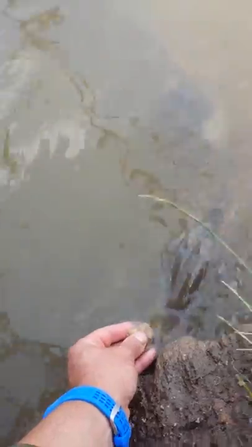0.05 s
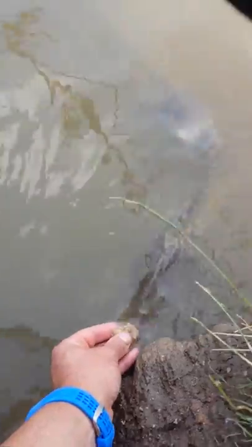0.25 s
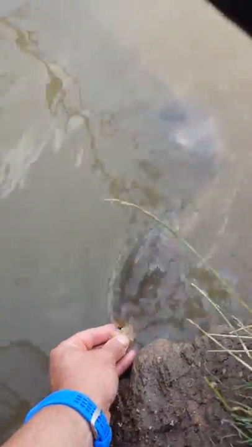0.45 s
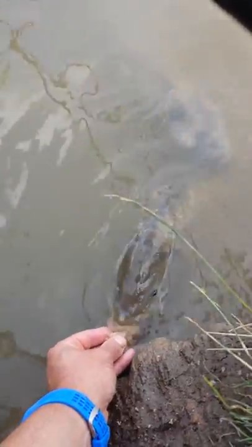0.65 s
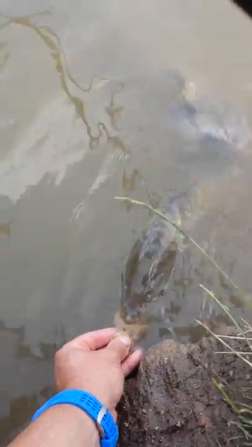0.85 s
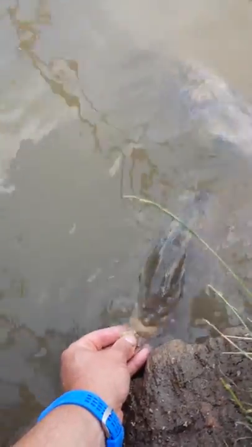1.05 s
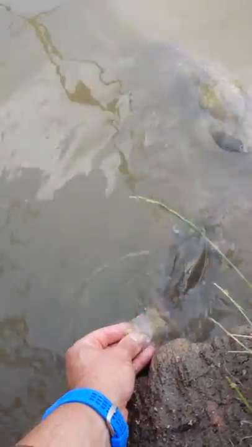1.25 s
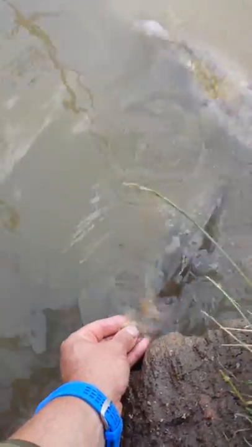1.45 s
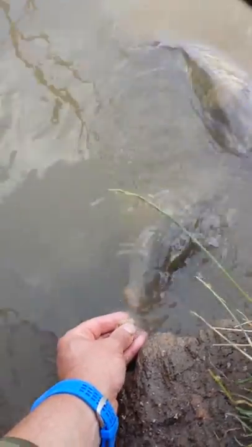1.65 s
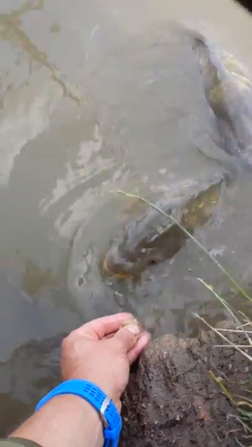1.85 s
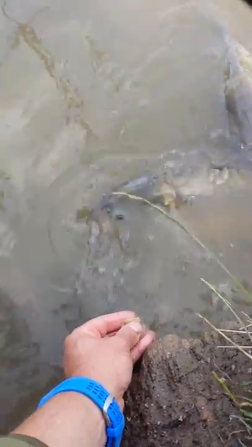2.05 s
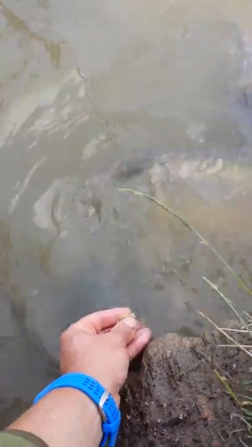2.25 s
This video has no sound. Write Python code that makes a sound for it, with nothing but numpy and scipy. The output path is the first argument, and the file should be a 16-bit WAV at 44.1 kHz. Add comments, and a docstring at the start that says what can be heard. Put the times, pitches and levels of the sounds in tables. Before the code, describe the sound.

A fish slurps and gulps at the water surface while wind buffets the microphone.

```python
"""At the bank of a pond, close to a phone, a carp sucks at food held at the surface.
Air and water crackle through its lips in a slurp, and bursting films excite the resonances of the
mouth as it smacks shut. As the fish turns away, pockets of air ring in gulps that rise in pitch.
Turbulent wind buffets the two microphone ports separately, over a steady hiss of grass and leaves."""
import sys
import numpy as np
from scipy import signal
from scipy.fft import rfft, irfft, next_fast_len
from scipy.io import wavfile
from scipy.ndimage import map_coordinates

SR = 44100
rng = np.random.default_rng(int(sys.argv[2]) if len(sys.argv) > 2 else 0)


def file_out(sig):
    """Save sig as 16-bit WAV at sys.argv[1]."""
    # one column per channel
    cols = np.atleast_2d(sig).T
    # limit, then scale
    lim = np.clip(cols, -1, 1)
    pcm = np.round(lim * 32767).astype(np.int16)
    wavfile.write(sys.argv[1], SR, pcm)


N = 105840


# Spectra of the mouth cavity and of fine bubbles. Each row: frequency in Hz, gain in dB.
MOUTH_SPECTRUM = [(100, -25), (350, -2.5), (700, -3.5), (950, -2), (1180, 3.5), (1450, -4), (1800, 1),
                  (2600, -10.5), (3400, -21), (6000, -38), (16000, -27)]
FIZZ_SPECTRUM = [(500, -14), (2500, 3), (3800, -6.5), (5200, 5.5), (7000, 2), (8300, -9), (9800, -22),
                 (11800, -12), (15200, -26)]
# Air drawn through the lips. Each row: time in seconds, rasp level in dB, fizz level in dB.
SLURP_LEVELS = [(.545, -41, -44), (.574, -35.5, -42), (.583, -44, -36), (.607, -31, -38), (.622, -31, -32),
                (.635, -40.5, -32), (.668, -33, -33.5), (.698, -29.5, -29), (.716, -38, -44),
                (.765, -48, -79)]

def slurp():
    """Source and filter: air tears through water at the lips, the cavity rasps and fine bubbles fizz."""
    t = np.arange(N) / SR
    sucking = (t > SLURP_LEVELS[0][0]) & (t < SLURP_LEVELS[-1][0])
    rasp = unit(colour(crackle(), MOUTH_SPECTRUM)) * curve(SLURP_LEVELS, column=1)
    fizz = unit(colour(crackle(), FIZZ_SPECTRUM)) * curve(SLURP_LEVELS, column=2)
    return sucking * (rasp + fizz)


def crackle(clicks_per_s=3500, spread_db=6):
    """Shot noise: tiny clicks of very uneven size arrive independently of one another."""
    hit = rng.random(N) < clicks_per_s / SR
    polarity = rng.choice([-1, 1], N)
    return hit * polarity * undb(spread_db * np.minimum(rng.exponential(size=N), 4))


# Spectrum of the spray. Each row: frequency in Hz, gain in dB.
SPRAY_SPECTRUM = [(500, -38), (2500, 0.5), (4000, -0.5), (5200, 1.5), (6800, 8), (8700, 1), (11500, -6),
                  (13000, -15), (15200, -15)]
# Bursting films. Each row: start in seconds, decay in seconds, mouth level in dB, spray level in dB.
FILM_BURSTS = [(0.5792, 0.00084, -3.5, -23), (0.5893, 0.0013, -22, -16.5), (0.594, 0.0011, -4, -36),
               (0.6047, 0.00094, -5.5, -19), (0.6305, 0.0028, -13.5, -34), (0.9881, 0.0047, -16.5, -32),
               (0.9973, 0.00093, -29, -12.5), (1.0369, 0.0017, -2.5, -17), (1.04, 0.0037, -12.5, -13.5),
               (1.045, 0.0042, -11.5, -13), (1.05, 0.0062, -30, -45), (1.0674, 0.0022, -36, -20),
               (1.075, 0.0017, -45, -14), (1.0881, 0.0015, -22, -36)]

def pops():
    """Impulse excitation: each water film bursting at the lips rings the mouth and throws spray."""
    out = np.zeros(N)
    for start, decay, mouth_db, spray_db in FILM_BURSTS:
        add(out, start, undb(mouth_db) * burst(decay, MOUTH_SPECTRUM))
        add(out, start, undb(spray_db) * burst(decay, SPRAY_SPECTRUM))
    return out


# Water squirting between the lips. Each row: start in seconds, level of its fizz in dB.
LIP_SQUIRTS = [(.6438, -18), (.652, -8.5), (.6635, -13.5), (.678, -19), (.6926, -14), (.6993, -18)]

def squirts(decay_s=0.00081, mouth_db=-4):
    """Cavity resonance: each squirt is a tick of fizz with a weaker ring of the mouth."""
    out = np.zeros(N)
    for start, db in LIP_SQUIRTS:
        tick = burst(decay_s, FIZZ_SPECTRUM) + undb(mouth_db) * burst(decay_s, MOUTH_SPECTRUM)
        add(out, start, undb(db) * tick)
    return out


# Spectrum of the airy fizz and the droplet ticks. Each row: frequency in Hz, gain in dB.
BRIGHT_SPECTRUM = [(1000, -30), (6000, 4), (8500, -7), (11000, 11), (15500, -9)]
# A short, high fizz of tiny bubbles, then three single droplets.
# Each row: start in seconds, decay in seconds, level in dB.
BRIGHT_BURSTS = [(0.572, 0.018, -32), (1.3843, 0.00087, -23.5), (1.68, .00075, -29), (2.275, 0.00081, -27)]

def fizz_and_droplets():
    """Small sources sound high: tiny bubbles fizz as the slurp begins, and single droplets tick later."""
    out = np.zeros(N)
    for start, decay, db in BRIGHT_BURSTS:
        add(out, start, undb(db) * burst(decay, BRIGHT_SPECTRUM))
    return out


# Air pockets closing at the surface.
# Each row: start in seconds, length in seconds, first pitch in Hz, last pitch in Hz, level in dB.
AIR_POCKETS = [(.914, 0.011, 390, 480, -27), (0.967, 0.032, 614, 1120, -38),
               (.9885, 0.014, 1290, 2440, -21.5), (.989, 0.018, 2430, 2950, -27),
               (1.034, 0.028, 814, 1260, -30.5), (1.058, 0.024, 2400, 2770, -32),
               (1.108, 0.0094, 615, 800, -22.5), (1.1965, 0.02, 530, 840, -18.5),
               (1.224, 0.015, 800, 980, -29), (1.2375, 0.034, 745, 1123, -19),
               (1.259, 0.013, 407, 480, -17), (1.277, 0.018, 577, 1200, -23),
               (1.322, 0.032, 726, 1074, -24.5), (1.334, 0.013, 470, 590, -24),
               (1.348, 0.0152, 1090, 2130, -32.5), (1.37, 0.0041, 1540, 1900, -24.5),
               (1.375, 0.0087, 2310, 2860, -33.5), (1.623, 0.013, 1070, 1310, -26),
               (1.624, 0.02, 1400, 1550, -35), (1.853, 0.018, 1423, 2080, -34),
               (1.852, 0.02, 900, 1270, -34)]

def gulps(attack_s=0.00041, fade=1.65, roughness=0.18, rough_hz=380):
    """Bubble resonance: a pocket of air rings higher as it shrinks, shaken by the moving water."""
    out = np.zeros(N)
    shake, wobble = walk(rough_hz), walk(rough_hz)
    for start, length, first_hz, last_hz, db in AIR_POCKETS:
        t = np.arange(int(length * SR)) / SR
        progress = t / length
        span = slice(int(start * SR), int(start * SR) + len(t))
        hz = first_hz * (last_hz / first_hz) ** progress
        phase = 2 * np.pi * np.cumsum(hz) / SR + roughness * wobble[span]
        envelope = (1 - np.exp(-t / attack_s)) * np.exp(-fade * progress) * (1 - progress ** 6)
        add(out, start, undb(db) * envelope * (1 + roughness * shake[span]) * np.sin(phase))
    return out


# Colouring of near sounds, weighted oppositely at the two ports.
# Each row: frequency in Hz, gain in dB before weighting.
PORT_CONTRAST = [(100, 0.5), (700, -3), (1290, 4.5), (2380, 7.5), (4400, 0), (8120, -12.5), (15000, -8)]

def at_phone(x, echo_db=-8.5, echo_decay_s=0.011, lag_s=0.000095, lag_below_hz=2060, size=4096):
    """Scattering and delay: the bank adds a short echo, and lower tones reach the right port later."""
    tail = np.exp(-np.arange(size) / SR / echo_decay_s)
    low = signal.sosfiltfilt(signal.butter(4, lag_below_hz, fs=SR, output="sos"), x)
    late = x - low + map_coordinates(low, [np.arange(N) - lag_s * SR])
    ports = []
    for weight, direct in ((0.66, x), (-0.42, late)):  # left, right
        bank_response = rng.standard_normal(size) * tail / np.sqrt(np.sum(tail ** 2))
        echo = signal.fftconvolve(x, bank_response)[:N]
        ports.append(colour(direct + undb(echo_db) * echo, PORT_CONTRAST, weight))
    return np.array(ports)


# Wind rumble. Each row: time in seconds, left level in dB, right level in dB.
RUMBLE_LEVELS = [(0, -37, -38.5), (.24, -28, -40), (.29, -35, -25), (.40, -32.5, -30), (.49, -17, -19.5),
                 (.57, -37.5, -28.5), (.78, -29, -16), (.87, -27.5, -19.5), (.94, -16.5, -18.5),
                 (1.06, -31, -17.5), (1.21, -20, -18.5), (1.34, -16, -14.5), (1.45, -26.5, -19),
                 (1.62, -24.5, -21), (1.83, -22.5, -19), (1.94, -30.5, -28), (2.09, -26.5, -33),
                 (2.4, -32.5, -32)]
# Strong eddies striking one port. Each row: centre time in seconds, pitch in Hz, level in dB.
LEFT_BUFFETS = [(.023, 124, -20.5), (.172, 128, -21), (.137, 161, -19), (.228, 106, -17), (.405, 184, -10),
                (.444, 245, -9.5), (.467, 174, -9), (.507, 224, -11.5), (.705, 250, -10), (.713, 181, -5),
                (.802, 214, -6), (.814, 226, -5), (.917, 325, -6.5), (1.165, 335, -12.5), (1.181, 262, -11),
                (1.203, 230, -7.5), (1.267, 184, -10), (1.283, 295, -3.5), (1.315, 172, -2),
                (1.328, 203, -2.5), (1.379, 191, -9), (1.763, 290, -15), (2.049, 117, -10),
                (2.105, 181, -14), (2.123, 116, -12)]
RIGHT_BUFFETS = [(.277, 121, -22), (.355, 139, -14.5), (.494, 126, -10.5), (.701, 131, -9.5),
                 (.774, 111, -9), (.854, 131, -8.5), (.938, 104, -5), (1.044, 200, -10), (1.112, 158, 0),
                 (1.181, 144, -2.5), (1.338, 81, -1.5), (1.366, 172, -7.5), (1.41, 135, -9.5),
                 (1.606, 112, -12), (1.636, 117, -10.5), (1.847, 103, -6.5), (1.983, 115, -11.5),
                 (2.025, 125, -8)]

def wind():
    """Turbulent pressure is local: each port has its own rumble and its own strong eddies."""
    left = rumble() * curve(RUMBLE_LEVELS, column=1) + eddies(LEFT_BUFFETS)
    right = rumble() * curve(RUMBLE_LEVELS, column=2) + eddies(RIGHT_BUFFETS)
    return np.array([left, right])


def eddies(table, ring=5.6, size=4096):
    """Pressure pulses: an eddy sweeping over a port is one low thud of a swing or two."""
    out = np.zeros(N + size)
    t = (np.arange(size) - size // 2) / SR
    for (centre, pitch_hz, db), turn in zip(table, rng.random(len(table))):
        scaled_time = 2 * np.pi * pitch_hz * t / ring  # a larger ring gives more swings
        phase = (ring + 1) * np.arctan(scaled_time) + 2 * np.pi * turn
        thud = np.cos(phase) / (1 + scaled_time ** 2) ** ((ring + 1) / 2)
        i = int(np.clip(centre * SR, 0, N))
        out[i:i + size] += undb(db) * thud
    return out[size // 2:size // 2 + N]


def rumble(count=480, centre_hz=112.6, spread_octaves=0.57, spread_db=0.5):
    """Superposition: small eddies of random pitch and strength merge into a low noise."""
    pitch, strength = rng.standard_normal((count, 2)).T
    times = (np.arange(count) + rng.random(count)) / count * N / SR
    hz = centre_hz * 2 ** (spread_octaves * pitch)
    return unit(eddies(np.column_stack([times, hz, spread_db * strength])))


# Spectra of the hiss: overall, side relative to mid, and left relative to right.
# Each row: frequency in Hz, gain in dB.
HISS_SPECTRUM = [(200, 6), (500, 8.5), (900, 3.5), (1400, -1), (2100, 0), (3300, -3.5), (5000, -1.5),
                 (6800, -5), (8200, -11), (10000, -17.5), (13000, -22)]
HISS_WIDTH = [(200, -22), (900, -2.5), (2000, -2), (4500, 0.5)]
HISS_BALANCE = [(200, -2.5), (1200, -0.5), (2300, 0), (4500, 1.5), (7500, -11.5), (15000, -5.5)]
# Strength of the hiss. Each row: time in seconds, level in dB.
HISS_ENVELOPE = [(0, -40.5), (.8, -38), (2.4, -37.5)]

def hiss():
    """Partial coherence: wind in distant grass and leaves reaches the ports as a smooth, wide noise."""
    mid = rng.standard_normal(N)
    side = colour(rng.standard_normal(N), HISS_WIDTH)
    ports = [colour(colour(mid + sign * side, HISS_SPECTRUM), HISS_BALANCE, sign / 2) for sign in (1, -1)]
    return unit(np.array(ports)) * curve(HISS_ENVELOPE)


def burst(decay_s, spectrum, size=2048):
    """A damped transient: coloured noise swells quickly and dies away, peaking near 1."""
    age = np.arange(size) / SR / decay_s
    envelope = 2 * np.sqrt(age) * np.exp(-age)
    spatter = colour(rng.standard_normal(size) * envelope, spectrum)
    return 0.36 * spatter * np.sqrt(np.sum(envelope ** 2) / np.sum(spatter ** 2))


def colour(x, spectrum, weight=1):
    """Minimum-phase filtering through (Hz, dB) points; weight scales the dB."""
    size = 2 * next_fast_len(len(x) // 2 + 2048, real=True)
    rows = np.array(spectrum, float)
    hz = np.maximum(np.arange(size // 2 + 1) * SR / size, 1)
    db = weight * np.interp(np.log(hz), np.log(rows[:, 0]), rows[:, 1])
    cepstrum = irfft(np.log(undb(db)))
    cepstrum[1:size // 2] *= 2  # folding onto positive time makes the filter causal
    cepstrum[size // 2 + 1:] = 0
    return irfft(rfft(x, size) * np.exp(rfft(cepstrum)))[:len(x)]


def curve(table, column=1):
    """Interpolation of one dB column of a time table into a gain per sample."""
    rows = np.array(table)
    return undb(np.interp(np.arange(N) / SR, rows[:, 0], rows[:, column]))


def walk(hz):
    """Spline interpolation of random values: a smooth wander with a spread near 1."""
    return map_coordinates(rng.standard_normal(4096), [np.arange(N) / SR * hz], mode="wrap")


def add(out, start, sound):
    """Linear mixing of a sound from a start time in seconds."""
    i = max(int(start * SR), 0)
    out[i:i + len(sound)] += sound[:max(N - i, 0)]


def undb(db):
    """Decibels to amplitude ratio."""
    return 10 ** (np.asarray(db) / 20)


def unit(x):
    """Normalisation to rms 1."""
    return x / np.sqrt(np.mean(x ** 2))


def scene():
    """Superposition: the fish, the wind on the phone and the distant hiss add at each port."""
    carp = slurp() + pops() + squirts() + fizz_and_droplets() + gulps()
    return at_phone(carp) + wind() + hiss()


def record(dry, low_cut_hz=44, top_hz=15450):
    """Band limiting: the phone thins the deepest bass and cuts the top."""
    thinned = signal.sosfilt(signal.butter(1, low_cut_hz, "high", fs=SR, output="sos"), dry)
    return signal.sosfilt(signal.ellip(10, .2, 80, top_hz, fs=SR, output="sos"), thinned)


dry = scene()
out = record(dry)
file_out(out)
```